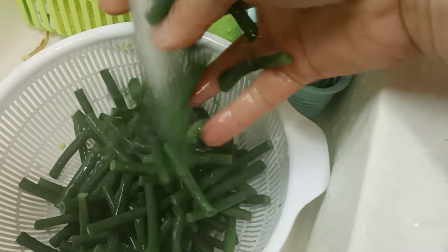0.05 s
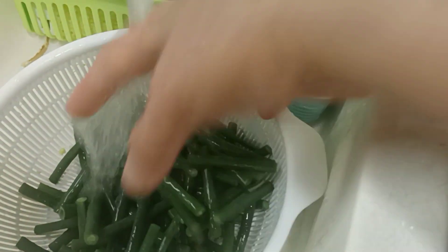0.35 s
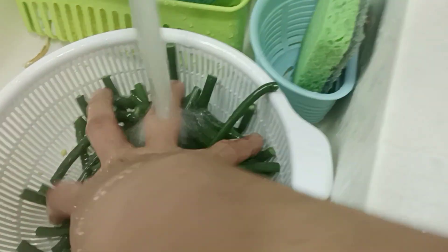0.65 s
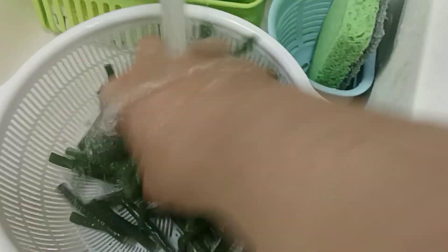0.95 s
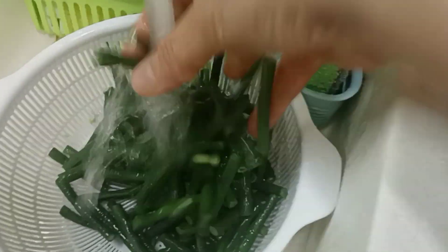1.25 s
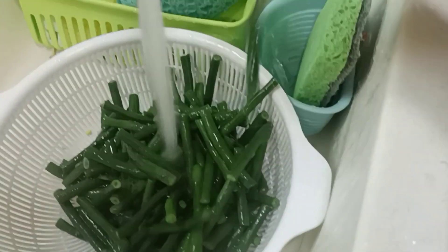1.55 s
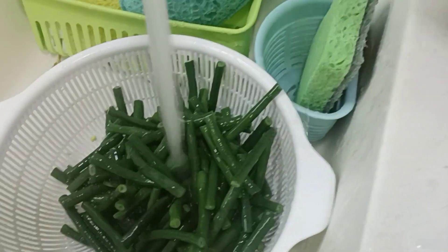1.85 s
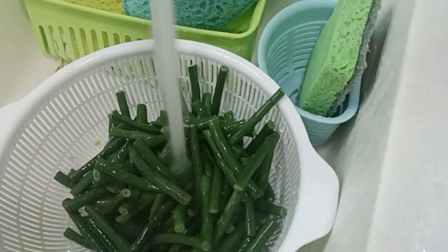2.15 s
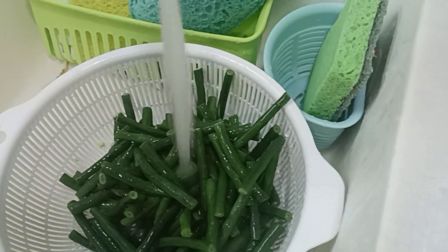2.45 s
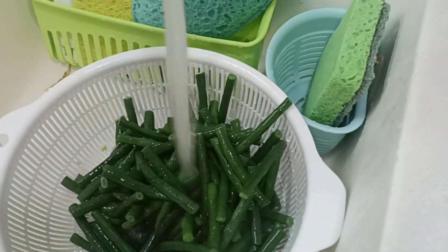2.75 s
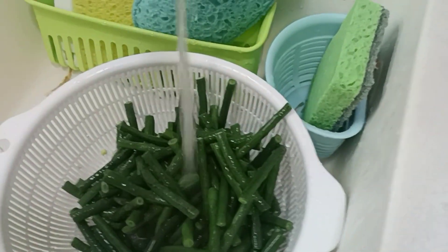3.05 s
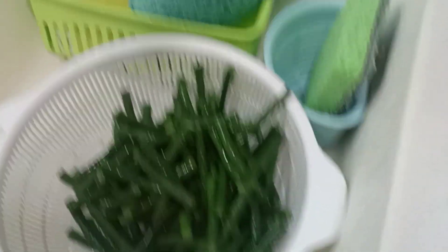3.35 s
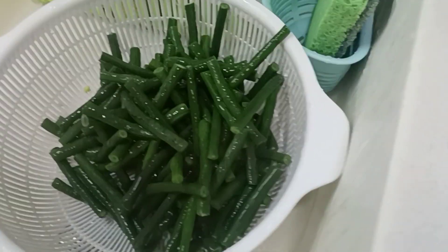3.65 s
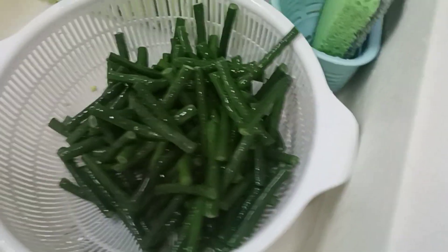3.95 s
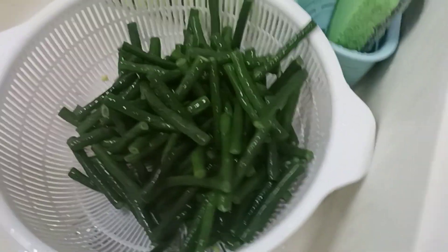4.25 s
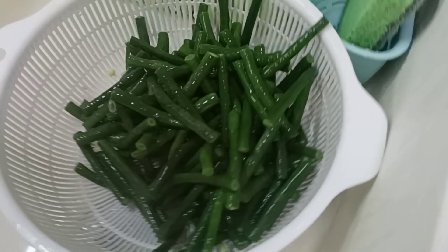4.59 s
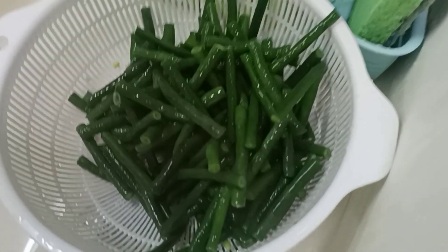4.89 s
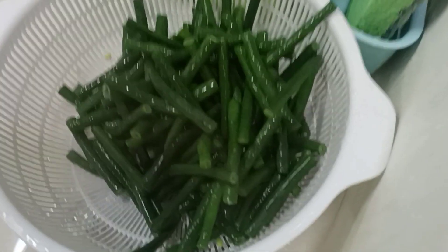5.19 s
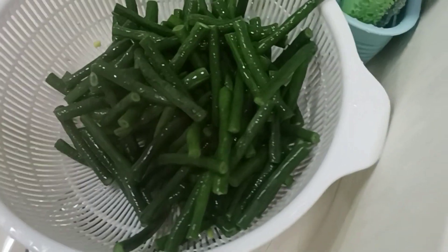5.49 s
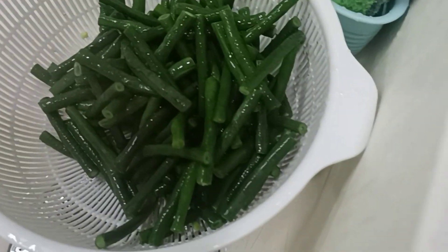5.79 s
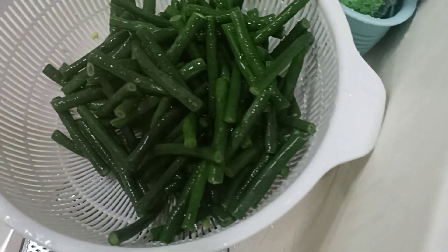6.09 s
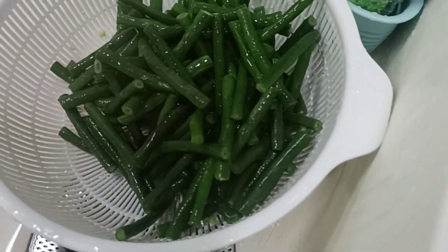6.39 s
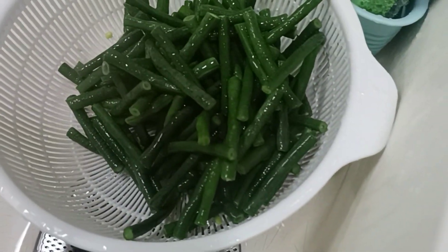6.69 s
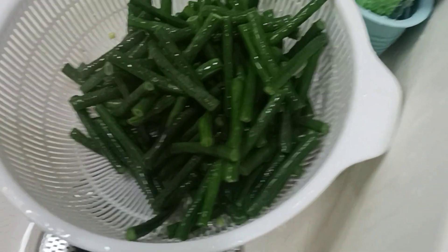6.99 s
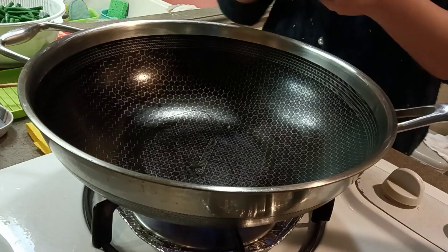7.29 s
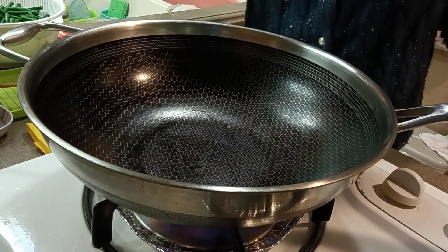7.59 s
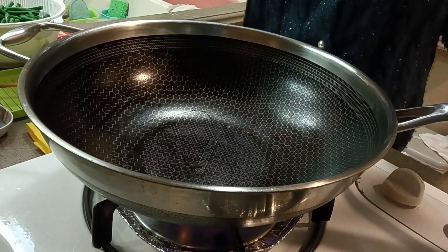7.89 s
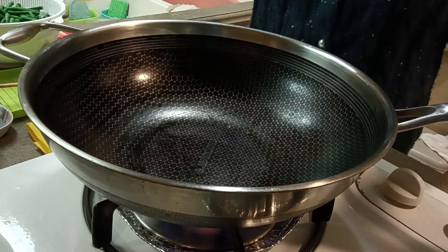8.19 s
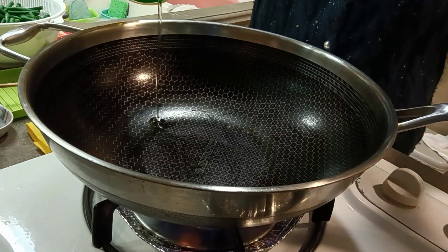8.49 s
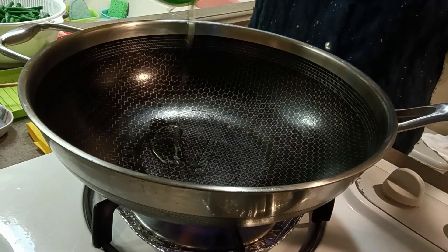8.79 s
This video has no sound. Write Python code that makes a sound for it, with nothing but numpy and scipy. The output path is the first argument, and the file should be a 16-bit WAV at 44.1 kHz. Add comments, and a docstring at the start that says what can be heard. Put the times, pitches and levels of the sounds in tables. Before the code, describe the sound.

Tap water splashes over vegetables in a colander, shuts off with a short groan, drips, then a gas flame rushes steadily.

```python
"""Tap water sprays over cut green stems in a plastic colander, close up at a kitchen sink; a hand stirs.
The valve sticks and slips shut with a short groan. The run-off fizzes, drips ring as trapped bubbles,
and a few hollow knocks and a clink sound close by. After a moment of silence we are at the stove:
a gas flame rushes steadily and resonates in the gap under a wok.
Heard on a stereo pair of microphones, with the middle range stronger on the left."""
import sys
import numpy as np
from scipy import signal
from scipy.fft import rfft, irfft
from scipy.io import wavfile
from scipy.ndimage import uniform_filter1d

SR = 44100
rng = np.random.default_rng(int(sys.argv[2]) if len(sys.argv) > 2 else 0)


def generate_wav(sig):
    """Save sig (samples, or channels by samples) to the path in sys.argv[1] as 16-bit PCM at SR."""
    pcm = np.round(np.clip(np.atleast_2d(sig).T, -1, 1) * 32767).astype(np.int16)
    wavfile.write(sys.argv[1], SR, pcm)


N = 389844
TIME = np.arange(N) / SR
BINS = np.maximum(np.fft.rfftfreq(N, 1 / SR), 1)
TAP_SHUT_S, SILENCE_FROM_S, SILENCE_TO_S = 3.054, 7.026, 7.145
CUTOFF_HZ = 15900

# modes of the hollow body that knocks and booms: f/Hz, level/dB, t60/s
HOLLOW_MODES = [(230, 16, 0.13), (608, 4.5, 0.07), (704, 3.5, 0.033), (1236, -2, 0.021),
                (1407, -6.5, 0.028), (1930, -18, 0.11), (2780, -17, 0.03), (3740, -31, 0.05)]


def from_db(db):
    """Decibels to gain."""
    return 10 ** (np.asarray(db) / 20)


def rms_one(x):
    """Scale to unit rms."""
    return x / np.sqrt(np.mean(x ** 2) + 1e-20)


def at_hz(points, hz):
    """Read a table along log frequency."""
    known_hz, values = np.transpose(points)
    return np.interp(np.log(hz), np.log(known_hz), values)


def since(start):
    """Seconds gone by after a moment, zero before it."""
    return np.maximum(TIME - start, 0)


def fade_in(start, length):
    """A ramp from 0 to 1."""
    return np.clip((TIME - start) / length, 0, 1)


def hump(s, length):
    """A smooth rise and fall of height 1 around a moment."""
    return np.exp(-2 * np.minimum(((TIME - s) / length) ** 2, 20))


def filtered(x, order, hz, kind):
    """A low, high or band pass."""
    return signal.sosfilt(signal.butter(order, hz, kind, fs=SR, output="sos"), x)


def colour(x, spectrum):
    """Give a flat sound a spectrum; rms 1."""
    return rms_one(irfft(rfft(x) * from_db(at_hz(spectrum, BINS)), N))


def drift(rate_hz):
    """A smooth random wander with spread 1."""
    step, run_in = 40, 2000
    pole = np.exp(-2 * np.pi * rate_hz * step / SR)
    noise = rng.standard_normal(N // step + run_in + 2)
    slow = signal.lfilter([1], [1, -2 * pole, pole * pole], noise)[run_in:]
    return np.interp(np.arange(N) / step, np.arange(len(slow)), rms_one(slow))


def ring(x, hz, t60):
    """One mode: a unit click starts a dying sine of height 1."""
    pole, angle = from_db(-60 / (t60 * SR)), 2 * np.pi * hz / SR
    return signal.lfilter([0, np.sin(angle)], [1, -2 * pole * np.cos(angle), pole * pole], x + 1e-18)


def resonate(x, resonances, waver_db, waver_hz=7):
    """Lift or cut narrow bands by a wavering amount, different at each microphone."""
    out = x.copy()
    for hz, width, *side_db in resonances:
        band = signal.lfilter(*signal.iirpeak(hz, hz / width, fs=SR), x)
        out += (from_db(side_db)[:, None] - 1) * band * from_db(waver_db * drift(waver_hz))
    return out


def turbulence(flicker_db, flicker_hz):
    """Flat stereo noise, alike on both sides in the bass; each octave flickers by itself."""
    # likeness of the sound at the two microphones: f/Hz, correlation/0-1
    likeness = [(80, 1), (250, 0.69), (420, 0.86), (700, 0.37), (1100, 0.09), (15000, 0.045)]
    alike = np.clip(at_hz(likeness, BINS), -.99, .99)
    mid, side = rfft(rng.standard_normal((2, N)))
    both = np.sqrt(1 + alike) * mid + np.sqrt(1 - alike) * side * [[1], [-1]]
    octave = np.floor(np.log2(np.maximum(BINS, 64)))
    bands = (irfft(both * (octave == k), N) for k in np.unique(octave))
    return rms_one(sum(band * from_db(flicker_db * drift(flicker_hz)) for band in bands))


def swells(rows, width):
    """Short swells of noise, each in one narrow band whose width is a share of its pitch."""
    out = np.zeros(N)
    for s, db, hz, length in rows:
        near = np.abs(TIME - s) < 2 * length
        band = filtered(rng.standard_normal(SR), 2, hz * np.exp([-width / 2, width / 2]), "band")
        swell = band[-near.sum():] * hump(s, length)[near]
        out[near] += from_db(db) * rms_one(swell) / 2
    return out


def kitchen(x, wet_db, t60):
    """Add the short tail of a small hard room, different at each microphone."""
    t = TIME[:SR // 2]
    tail = rng.standard_normal((2, len(t))) * from_db(-60 * t / t60) * (t > .003)
    tail /= np.sqrt(np.sum(tail ** 2) / 2)
    return x + from_db(wet_db) * signal.fftconvolve(np.atleast_2d(x), tail, axes=1)[:, :N]


def droplets(per_s, low_hz, cycles, spread_db, pitches=28):
    """Droplets burst at random, each ringing briefly at its own pitch and place; rms 1."""
    out = np.zeros((2, N))
    when, size, pitch, place, sign = rng.random((5, int(per_s * TIME[-1])))
    height = from_db(spread_db * np.minimum(-np.log(1 - size), 4.5)) * np.sign(sign - .5)
    for k, hz in enumerate(np.geomspace(low_hz, CUTOFF_HZ, pitches)):
        chosen = (pitch * pitches).astype(int) == k
        at = (when[chosen] * N).astype(int)
        lag = (place[chosen] * SR / 1000).astype(int)   # up to 1 ms between the microphones
        clicks = np.array([np.bincount(i % N, height[chosen], N) for i in (at, at + lag)])
        out += hz * ring(clicks, hz, cycles / hz)
    return rms_one(out)


def running_tap():
    """The jet sprays off the stems; with the hand away it drills into one spot and the sink rings."""
    # spectrum of the jet on the stems: f/Hz, level/dB
    spray_spectrum = [(300, -29), (520, -0.5), (900, -7.5), (1400, 0), (2400, -4), (3400, -1), (4500, 2),
                      (7000, 4), (10000, 2), (11500, -6), (13800, -14), (15200, -1), (16000, -6.5)]
    # the stirring hand gets in the way and softens the spray: t/s, level/dB
    hand_shield = [(0, -2.5), (.55, -3.5), (.65, 0), (.95, 2.5), (1.1, -1), (1.3, -4.5), (1.45, -0.5)]
    splash_db, spray_db, hand_away_s, fall_db_per_s = -39.5, -42, 1.387, 120
    drops = droplets(per_s=3500, low_hz=1096, cycles=48, spread_db=2)
    water = colour(turbulence(flicker_db=1.1, flicker_hz=9.7) + from_db(-5) * drops, spray_spectrum)
    ringing = sink_ringing(water)
    spatter = droplets(per_s=2200, low_hz=1683, cycles=70, spread_db=3.5, pitches=24)
    slop = splashes(0.4 * water + 0.6 * ringing + spatter)
    settled = 0.19 + 0.83 * fade_in(hand_away_s, 0.044)
    water = rms_one(water + settled * ringing)
    low_splash = signal.sosfiltfilt(signal.butter(3, 4200, fs=SR, output="sos"), water)
    fine_spray = water - low_splash
    shield_db = np.interp(TIME, *np.transpose(hand_shield))
    jet = from_db(splash_db + 0.15 * shield_db) * low_splash + from_db(spray_db + shield_db) * fine_spray
    return jet * from_db(1.16 * drift(24) - fall_db_per_s * since(TAP_SHUT_S)) + slop


def sink_ringing(water):
    """What the sink's resonances add to the stream; those that the jet favours ring the most."""
    # resonances of the sink: f/Hz, width/Hz, left/dB, right/dB
    resonances = [(2240, 142, 10.5, 5), (2935, 48, 9.5, 3), (3390, 70, 9.5, -10), (4350, 170, 6, 7),
                  (4740, 96, 3, 5.5), (5830, 290, 5, -8), (6610, 150, 3.5, 4), (7000, 210, -10, 4)]
    # as the stems settle the jet favours one resonance after another: t/s, boost/dB, f/Hz, length/s
    focuses = [(1.465, 13.5, 3390, 0.11), (1.48, 7.5, 2935, 0.07), (1.62, 6, 3390, .07),
               (1.636, 10, 2935, 0.15), (2.733, 13, 4770, 0.82)]
    out, focus_octaves = 0, 0.054
    for row in resonances:
        boost_db = sum(db * hump(s, length) * np.exp(-(np.log2(row[0] / hz) / focus_octaves) ** 2)
                       for s, db, hz, length in focuses)
        out += from_db(boost_db) * (resonate(water, [row], waver_db=3, waver_hz=12) - water)
    return out


def splashes(water, width=0.64):
    """Each slop of water is a short surge of one broad band of the stream."""
    # handfuls of water slop off the stems: t/s, level/dB, f/Hz, length/s
    slops = [(0.092, -45, 4630, 0.039), (0.624, -41.5, 6300, .021), (0.664, -38, 7050, 0.009),
             (0.8, -42, 2950, 0.068), (0.82, -42.5, 4700, 0.04), (.853, -36, 2200, .009),
             (0.879, -41, 2150, 0.0059), (0.902, -47, 6500, 0.013), (1.174, -48, 4600, .033),
             (1.22, -51, 2220, 0.034), (1.466, -56, 3740, 0.038), (1.639, -41, 4400, 0.023),
             (2.88, -48, 4600, 0.073), (4.502, -70, 2200, 0.055), (5.556, -66, 7300, .014),
             (5.613, -67.5, 6000, 0.009)]
    out = 0
    for s, db, hz, length in slops:
        edges = np.minimum(hz * np.exp([-width / 2, width / 2]), CUTOFF_HZ)
        out += from_db(db) * hump(s, length) * rms_one(filtered(water, 2, edges, "band"))
    return out


def room_tone():
    """Low kitchen ambience behind the sink, with a few wavering resonances."""
    # spectrum of the room's air: f/Hz, level/dB
    spectrum = [(25, -30.5), (45, -9), (80, 6.5), (115, 1.5), (160, -1.5), (230, 4.5), (340, -6.5),
                (500, -6.5), (700, -7), (900, -6.5), (1400, -12), (2000, -14), (3200, -28), (6500, -50),
                (13000, -61.5)]
    # resonances of the room: f/Hz, width/Hz, left/dB, right/dB
    resonances = [(255, 57, -4.5, -6), (451.3, 21.6, 5, -13), (872.4, 32, 7, 9)]
    air = colour(turbulence(flicker_db=.5, flicker_hz=20), spectrum)
    return from_db(-58) * resonate(air, resonances, waver_db=6.5)


def low_swells(thud_hz=89.6):
    """Soft bumps, water rumbling in the sink and a flutter of the flame, each over a weaker low thud."""
    # short low swells: t/s, level/dB, f/Hz, length/s
    surges = [(0.524, -53.5, 248, 0.13), (0.903, -47.5, 215, 0.049), (1.18, -56, 87, .07),
              (2.013, -52, 79, 0.036), (2.33, -52, 83.4, .025), (2.318, -53.5, 310, 0.036),
              (2.448, -45, 276, 0.026), (2.67, -46, 255, 0.022), (3.074, -43.5, 129, 0.032),
              (4.177, -54, 308, 0.052), (7.31, -37, 128.5, 0.03), (7.745, -41.5, 114, .025),
              (8.599, -47, 121, 0.03)]
    thuds = [(s, db - 5.5, thud_hz, length * 0.84) for s, db, _, length in surges]
    return swells(surges, width=0.27) + swells(thuds, width=0.49)


def gurgles():
    """Air gurgles between the stems in short, almost pitched bursts."""
    # pockets of air: t/s, level/dB, f/Hz, length/s
    pockets = [(.64, -46, 2360, 0.021), (.678, -44.5, 6200, 0.024), (.80, -47, 3270, 0.031),
               (.842, -40.5, 4320, 0.028), (.863, -44.5, 3140, 0.013), (1.635, -46.5, 2250, 0.031),
               (1.825, -49.5, 1170, 0.016), (2.085, -46.5, 2240, 0.052), (2.215, -50, 2240, 0.018),
               (2.895, -45, 2210, .018)]
    return swells(pockets, width=0.065)


def closing_tap(jitter=.05):
    """The valve sticks and slips, faster and brighter as it tightens, and shakes the tap's modes."""
    # the valve grabs twice: t/s, length/s, level/dB
    grabs = [(2.942, 0.0784, -30), (3.014, 0.03, -36.5)]
    # modes of the tap: f/Hz, level/dB, t60/s
    modes = [(128, -13, .03), (238, 2, .034), (345, -16, .03), (468, -6, .04), (540, 2, .04),
             (810, -9, .045)]
    slip_hz, rise_hz_per_s, attack_s, release_db_per_s = 116, 260, 0.021, 604.5
    first_s, first_length, _ = grabs[0]
    tightened_s = np.minimum(since(first_s), first_length)
    turns = np.cumsum((slip_hz + rise_hz_per_s * tightened_s) * (1 + jitter * drift(65.2))) / SR
    slips = np.diff(np.floor(turns), prepend=0) * from_db(2.5 * drift(80))
    friction = slips + from_db(-33) * rng.standard_normal(N)   # grinding between the slips
    tilt_db_per_oct = -4.5 + 61 * tightened_s
    body = sum(ring(friction, hz, t60) * from_db(db + tilt_db_per_oct * np.log2(hz / slip_hz))
               for hz, db, t60 in modes)
    body = filtered(body, 7, [85, 860], "band")
    even_groan = body / np.sqrt(uniform_filter1d(body ** 2, size=SR // 30) + 1e-12)
    envelopes = [fade_in(s, attack_s) * from_db(db - release_db_per_s * since(s + length))
                 for s, length, db in grabs]
    return even_groan * np.max(envelopes, axis=0)


def runoff(start_db=-54.5, loss_db=32.5, drain_s=3):
    """Water seeps through the colander in a fizz that thins out, fast at first and then slowly."""
    # spectrum of the seeping water: f/Hz, level/dB
    spectrum = [(300, -13), (800, 2), (1400, 17), (2300, 4.5), (3200, 6.5), (5200, 5.5), (7000, 1.5),
                (10000, -3.5), (13800, -16.5), (14900, 0), (15800, -0.5)]
    # the recorder briefly turns the hiss down after the knocks: t/s, depth/dB, length/s
    recorder_ducks = [(5.755, 13, 0.1), (6.085, 8, 0.065)]
    drained = 1 - np.exp(-since(TAP_SHUT_S) / drain_s)
    duck_db = sum(db * hump(s, length) for s, db, length in recorder_ducks)
    drops = droplets(per_s=1200, low_hz=900, cycles=40, spread_db=2.8)
    fizz = colour(turbulence(flicker_db=1.5, flicker_hz=45) + from_db(-8.5) * drops, spectrum)
    return from_db(start_db - loss_db * drained - duck_db) * fizz * fade_in(TAP_SHUT_S, 0.19)


def ticks(per_s=36, start_db=-54, spread_db=10, fade_db_per_s=8):
    """Tiny bubbles burst on the wet stems, ever more faintly, each louder on one side or the other."""
    bursts = (rng.random(N) < per_s / SR) * (TIME > TAP_SHUT_S)
    scatter_db = spread_db * np.clip(rng.standard_normal((2, N)), -2, 2)
    height = from_db(start_db - fade_db_per_s * since(TAP_SHUT_S) + scatter_db)
    return filtered(bursts * height + 1e-18, 1, 6000, "high")


def faint_drips(per_s=16, start_db=-45.5, spread_db=3, fade_db_per_s=4.5, low_hz=1680, high_hz=8800):
    """Random drips that weaken as the colander empties, as rows of t/s, level/dB, f/Hz."""
    span = SILENCE_FROM_S - TAP_SHUT_S
    when, size, pitch = rng.random((int(per_s * span), 3)).T
    age = when * span
    db = start_db - fade_db_per_s * age + spread_db * (2 * size - 1)
    return list(zip(TAP_SHUT_S + age, db, low_hz * (high_hz / low_hz) ** pitch))


def drips(cycles=52):
    """Each drip traps a bubble whose tone swells within two cycles and rings briefly."""
    # the clearest drips: t/s, level/dB, f/Hz
    clear_drips = [(3.3105, -23, 1305), (3.312, -45, 3170), (3.707, -47, 6800), (3.756, -48, 9050),
                   (4.014, -45, 1400), (4.017, -47, 2870), (4.123, -50, 3180), (4.325, -54, 2220),
                   (4.452, -47, 2000), (4.485, -46, 3100), (4.519, -47, 2780), (4.52, -51, 3580),
                   (5.048, -49.5, 5550), (5.119, -43.5, 1430), (5.548, -50, 8900), (6.22, -49, 6640)]
    out, t = np.zeros(N), TIME[:SR // 10]
    for s, db, hz in list(clear_drips) + faint_drips():
        at, turns = int(s * SR), hz * t
        envelope = from_db(db - 60 * turns / cycles) * (1 - np.exp(-(turns / 1.5) ** 2))
        out[at:at + len(t)] += envelope * np.sin(2 * np.pi * turns)
    return out


def knocks(falloff_db_per_oct=12.5):
    """Each knock lands elsewhere on the hollow body, favours the modes near one pitch and chatters."""
    # hollow knocks close by: t/s, level/dB, favoured f/Hz
    hits = [(5.58, -47.5, 600), (5.595, -40.5, 1400), (5.66, -34.5, 1460), (5.7163, -44, 1300),
            (5.734, -40.5, 676), (5.9235, -38.5, 1420), (5.994, -41.5, 1150), (6.013, -42, 700)]
    contacts_per_s, chatter_db, fade_db_per_s = 460, -14.5, 300
    s, db, favoured_hz = np.transpose(hits)
    dying = sum(from_db(level + chatter_db - fade_db_per_s * np.minimum(since(at), 1)) * (TIME > at)
                for at, level in zip(s, db))
    chatter = dying * rng.standard_normal(N) * (rng.random(N) < contacts_per_s / SR)
    out = from_db(-7) * filtered(chatter, 2, 8000, "low")   # the bare ticks of the small contacts
    for hz, mode_db, t60 in HOLLOW_MODES:
        heights = from_db(db + mode_db - falloff_db_per_oct * np.abs(np.log2(hz / favoured_hz)))
        strikes = np.bincount((s * SR).astype(int), heights, N)
        rattle = from_db(mode_db - 6.4 * np.abs(np.log2(hz / 1500))) * chatter
        out += ring(strikes + rattle, hz, t60)
    return filtered(out, 2, 150, "high")


def booms(waver=0.0453, fall_db_per_s=502):
    """Among the knocks the hollow body's lowest mode swells into a nearly pure tone and rings out."""
    # crests of the booming: t/s, level/dB, rise/s
    crests = [(5.61, -38.5, 0.027), (5.683, -47, .012), (5.741, -34, 0.012)]
    turns = np.cumsum(HOLLOW_MODES[0][0] * (1 + waver * drift(37.1))) / SR
    level = sum(from_db(db) * np.where(TIME < s, hump(s, rise), from_db(-fall_db_per_s * since(s)))
                for s, db, rise in crests)
    return level * np.sin(2 * np.pi * turns)


def scrapes():
    """Light rubbing that catches and crackles."""
    # rubs around the last knocks: t/s, level/dB, f/Hz, length/s
    rubs = [(5.95, -74, 3900, 0.063), (5.955, -82, 5060, .055), (5.997, -71, 6400, 0.023)]
    return swells(rubs, width=.2) * from_db(4 * drift(200))


def clink(at_s=6.712, strike_db=-52):
    """One light touch on something hard rings briefly."""
    # modes of the hard object: f/Hz, level/dB, t60/s
    modes = [(3090, 5.5, 0.024), (3740, -13, .06), (5900, -18, 0.02), (7700, -29, .015)]
    click = np.bincount([int(at_s * SR)], [from_db(strike_db)], N)
    return sum(from_db(db) * ring(click, hz, t60) for hz, db, t60 in modes)


def burner():
    """The gas flame's turbulent rush swells, flares once and holds; the gap under the wok sings."""
    # spectrum of the flame: f/Hz, level/dB
    spectrum = [(25, -24), (60, -11.5), (125, 4), (170, 0), (300, -7.5), (420, -3), (780, 0.5),
                (1050, -8.5), (1700, -7), (2300, -13), (3200, -16), (6200, -20.5), (8000, -29), (9500, -28),
                (13800, -39.5), (15200, -29.5)]
    # resonances of the wok over the flame: f/Hz, width/Hz, left/dB, right/dB
    wok_resonances = [(396, 39, 6.8, 5.5), (524, 107, 2.8, 6.5), (837, 31, 2.9, -2), (970, 13, 3.2, -10),
                      (1057, 23, 5.2, 8), (1782, 34, 7, -4), (2604, 82, 8.4, 7), (3070, 110, 7.2, 7),
                      (3790, 50, 10, 3.5)]
    # the singing resonance of the gap: f/Hz, width/Hz, left/dB, right/dB
    gap_resonance = [(1385, 110, 8, 3.5)]
    flame_db, rise_s, flare_db, flare_s, song_s = -39.5, 0.14, 1.5, 7.305, 7.36
    flame = colour(turbulence(flicker_db=1.24, flicker_hz=51), spectrum)
    rush = rms_one(resonate(flame, wok_resonances, waver_db=2.5))
    song = resonate(rush, gap_resonance, waver_db=1.2) - rush
    level = from_db(flame_db + flare_db * hump(flare_s, 0.048)) * fade_in(SILENCE_TO_S, rise_s) ** 0.81
    return level * (rush + fade_in(song_s, 0.02) * song)


def scene():
    """First at the sink, then silence, then at the stove."""
    # a resonance on the steady sounds, at the left microphone: f/Hz, width/Hz, left/dB, right/dB
    port_resonance = [(1363, 237, 5.53, 0.027)]
    room = room_tone()
    handling = kitchen(knocks() + scrapes() + clink(), wet_db=-7, t60=0.07)
    groan = kitchen(closing_tap(), wet_db=-20, t60=.15)
    sink = running_tap() + runoff() + room
    before_silence = 1 - fade_in(SILENCE_FROM_S, 0.00283)
    steady = resonate(sink * before_silence + burner(), port_resonance, waver_db=1.5)
    bubbling = kitchen(gurgles(), wet_db=-0.5, t60=0.063)
    dripping = kitchen(drips() + ticks(), wet_db=-8, t60=.09)
    return steady + bubbling + dripping * before_silence + handling + groan + low_swells() + booms()


def record(dry):
    """The left microphone hears everything a little later and the mids more strongly; the top is cut."""
    # left microphone against right: f/Hz, level/dB
    balance = [(60, 2.6), (200, 2.48), (270, 0.7), (420, 6), (700, 7.88), (1000, 8.84), (1400, 9.45),
               (2200, 8.22), (3000, 4.96), (4200, -1), (5200, 1.9), (6500, 0.16), (15000, 0.8)]
    left_lag_s = .00084
    ratio = from_db(at_hz(balance, BINS))
    delay = np.exp(-2j * np.pi * BINS * left_lag_s)
    sides = np.array([ratio * delay, np.ones_like(ratio)]) * np.sqrt(2 / (1 + ratio ** 2))
    low_pass = 1 / np.sqrt(1 + (BINS / CUTOFF_HZ) ** 800)
    return irfft(rfft(dry) * sides * low_pass, N)


dry = scene()
out = record(dry)
generate_wav(out)
```